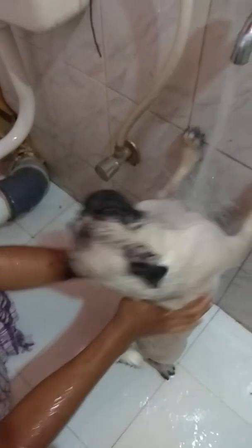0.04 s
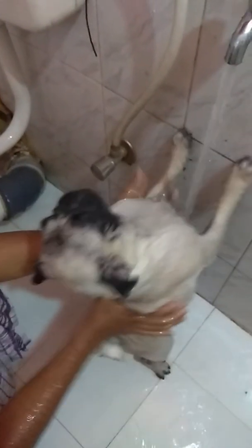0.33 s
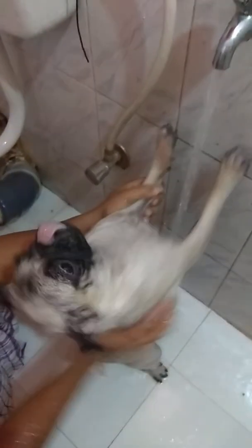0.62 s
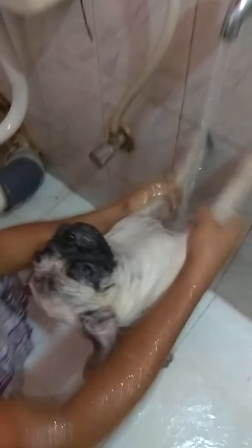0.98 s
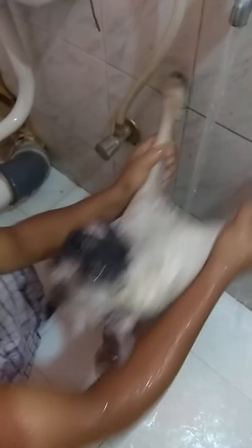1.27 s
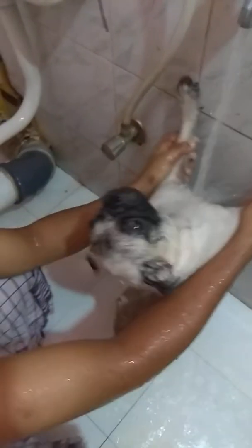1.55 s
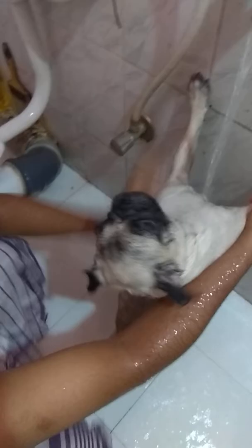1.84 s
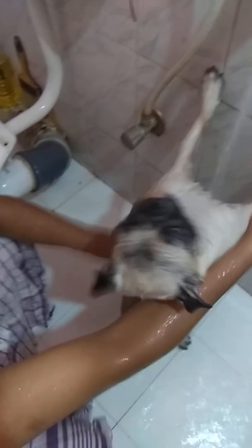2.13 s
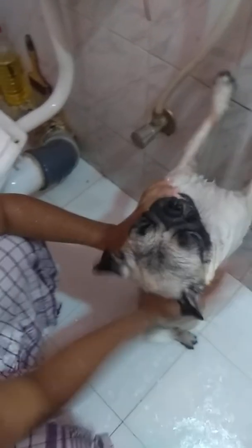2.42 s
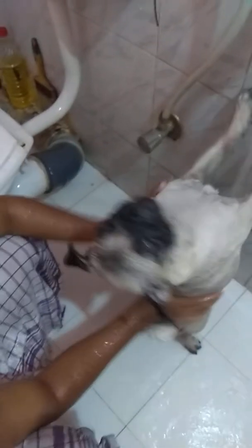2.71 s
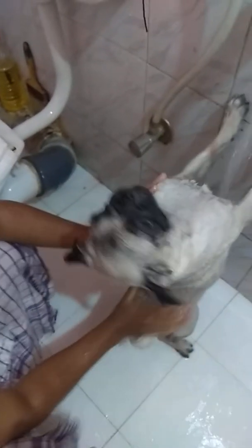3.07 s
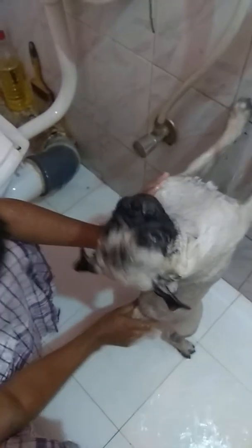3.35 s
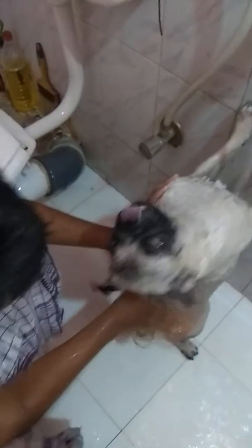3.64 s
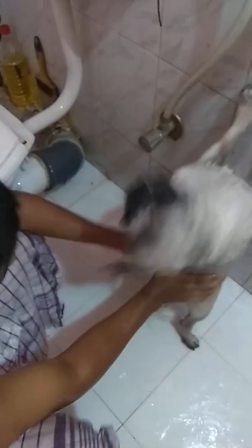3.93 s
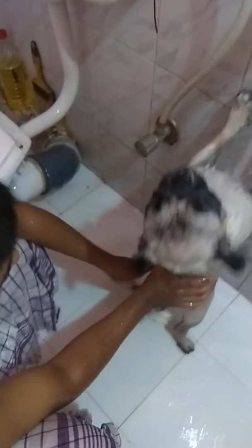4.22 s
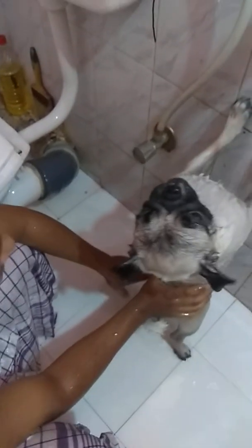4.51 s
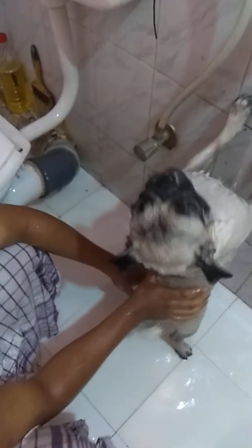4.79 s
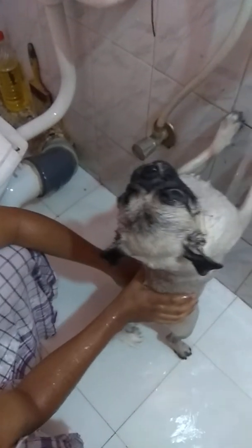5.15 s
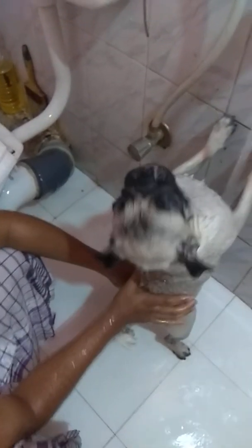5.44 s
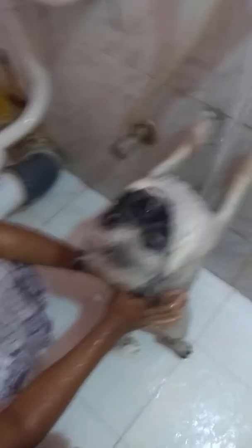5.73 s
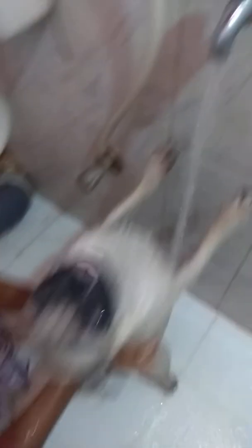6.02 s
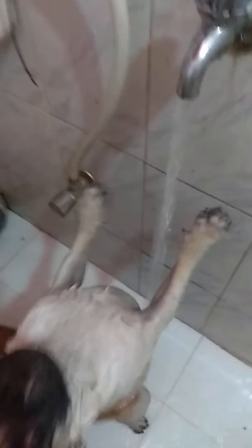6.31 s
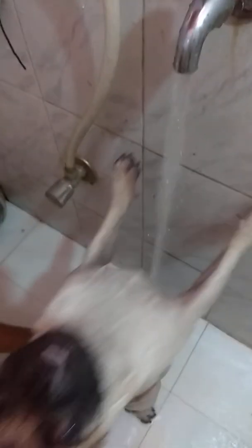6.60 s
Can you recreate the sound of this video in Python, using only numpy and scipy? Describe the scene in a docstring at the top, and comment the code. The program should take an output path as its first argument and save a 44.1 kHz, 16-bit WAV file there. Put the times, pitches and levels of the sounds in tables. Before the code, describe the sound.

In an echoing tiled bathroom, a running tap sprays and spatters unevenly, burbling on a dog's wet coat and slapping the floor.

```python
"""Hissing spray and patter on tiles: a tap runs in a small bathroom while wet hands wash a dog.
The jet breaks into tiny impacts and ringing bubbles, and dips when a hand or paw smothers it.
On the dog it burbles in the coat and drums dully on the body, waking the room's standing waves.
Handfuls of water slap on the floor, hard drops tick close by, and the walls ring with it all
over a faint house rumble."""
import sys
import numpy as np
from scipy import signal
from scipy.fft import rfft, irfft, next_fast_len
from scipy.io import wavfile
from scipy.ndimage import uniform_filter1d, minimum_filter1d, map_coordinates

SR = 44100
rng = np.random.default_rng(int(sys.argv[2]) if len(sys.argv) > 2 else 0)


def output_pcm(signal):
    """Save a mono or channel-first signal as 16-bit PCM at the path in sys.argv[1].

    Samples are clipped to [-1, 1] before scaling.
    """
    pcm = np.clip(np.atleast_2d(signal).T, -1, 1) * 32767
    wavfile.write(sys.argv[1], SR, np.round(pcm).astype(np.int16))


N = 293706
TIME = np.arange(N) / SR
FFT_SIZE = next_fast_len(N + SR // 20, True)
CUTOFF_HZ = 15900

# jet strength: (time [s], fine spray level [dB], large drop level [dB])
JET_LEVELS = [(0.0, -26.5, -30), (0.49, -27.5, -31), (0.54, -20, -22.5), (1.1, -17, -22),
              (1.35, -15.5, -25.5), (1.62, -18, -19.5), (1.9, -17.5, -24), (2.15, -19, -23.5),
              (2.55, -17, -25), (3.1, -18.5, -30), (3.6, -16.5, -22.5), (3.92, -19.5, -24),
              (4.22, -26.5, -30), (4.5, -28.5, -29), (4.85, -26, -28.5), (5.15, -21.5, -26.5),
              (5.22, -17, -24), (6.05, -19, -23.5), (6.35, -18.5, -27), (6.66, -22, -22.5)]


def from_db(db):
    """Decibels to gain."""
    return 10 ** (np.asarray(db) / 20)


def unit_rms(x):
    """Scale to rms 1."""
    return x / np.sqrt(np.mean(x ** 2) + 1e-20)


def in_time(rows):
    """Each column of a time table at every sample."""
    times_s, *columns = np.transpose(rows)
    return [np.interp(TIME, times_s, column) for column in columns]


def at_hz(points, hz):
    """Read a table on a log-frequency axis."""
    knots_hz, values = np.transpose(points)
    return np.interp(np.log(np.maximum(hz, 1)), np.log(knots_hz), values)


def filtered(x, gain_at):
    """Filter by a gain that is a function of frequency."""
    size = next_fast_len(x.shape[-1] + SR // 20, True)
    return irfft(rfft(x, size) * gain_at(np.fft.rfftfreq(size, 1 / SR)), size)[..., :x.shape[-1]]


def tinted(x, spectrum):
    """Filter by a spectrum table; rms 1."""
    return unit_rms(filtered(x, lambda hz: from_db(at_hz(spectrum, hz))))


def ring(x, hz, t60_s):
    """One decaying mode driven by x."""
    r, w = from_db(-60 / (t60_s * SR)), 2 * np.pi * hz / SR
    return signal.lfilter([0, np.sin(w)], [1, -2 * r * np.cos(w), r * r], x + 1e-18)


def impacts(per_s, spread_db, size=N):
    """Drops landing at random: impulses of uneven strength and random sign."""
    chance, bulk = rng.random((2, size))
    hits, out = np.flatnonzero(chance < per_s / SR), np.zeros(size)
    out[hits] = from_db(-spread_db * np.log(bulk[hits] + 1 / 100)) * (-1.) ** hits
    return out


def bubbles(per_s, low_hz, high_hz, cycles, rise, count, size):
    """Trapped air rings at a pitch set by its size, rising as it nears the surface."""
    chance, when, smallness, strength = rng.random((count, 4)).T[:, :, None]
    hz, t = low_hz * (high_hz / low_hz) ** smallness, TIME[:size]
    age = hz * t / cycles
    sounding = chance < per_s * N / SR / count
    gain = sounding * from_db(-4.0 * np.log(strength + 1 / 20)) * np.sqrt(hz)
    fade = from_db(-60 * age) * (1 - t / t[-1])
    pings = gain * fade * np.sin(2 * np.pi * hz * t * (1 + rise * age))
    samples = (when * N).astype(int) + np.arange(size)
    return unit_rms(np.bincount(samples.ravel(), pings.ravel(), N)[:N])


def room_response(direct_db, bands=8):
    """Stereo impulse response: direct sound, then dense tile echoes, longest in the midrange."""
    # reverberation: (frequency [Hz], t60 [s])
    decay = [(100, 0.33), (500, 0.61), (2000, 0.67), (6000, 0.24), (15000, 0.45)]
    # left-right likeness of the echoes: (frequency [Hz], correlation [-1..1])
    likeness = [(60, 0.84), (160, 0.89), (350, 0.74), (600, 0.68), (1100, 0.13), (2000, -0.096),
                (15000, 0.082)]
    t, hz = TIME[:SR], np.fft.rfftfreq(SR, 1 / SR)
    mid, side = rfft(rng.standard_normal((2, SR)))
    alike = at_hz(likeness, hz)
    echoes = np.sqrt(1 + alike) * mid + np.sqrt(1 - alike) * side * [[1], [-1]]
    centres_hz, response = np.geomspace(100, CUTOFF_HZ, bands), 0
    for centre_hz, share in zip(centres_hz, np.eye(bands)):
        fade = from_db(-60 * t / at_hz(decay, centre_hz))
        band = irfft(echoes * at_hz(np.c_[centres_hz, share], hz), SR)
        response = response + band * fade / np.sqrt(2 * np.sum(fade ** 2))
    response[[0, 1], [0, 12]] += from_db(direct_db)   # right lags 12 samples
    return response / np.sqrt(1 + from_db(2 * direct_db))


def heard_in(room, x):
    """A mono source through the stereo room response."""
    return signal.fftconvolve(x[None], room, axes=1)[:, :N]


def landing_spots(direct_db, count=4, moves_per_s=1.62):
    """The water shifts as the dog moves: (share over time, room transfer function) per spot."""
    turn = moves_per_s * TIME - np.arange(count)[:, None]
    shares = np.maximum(np.cos(2 * np.pi * turn / count), 0)
    shares /= np.sqrt(np.sum(shares ** 2, axis=0))
    return [(share, rfft(room_response(direct_db), FFT_SIZE)) for share in shares]


def stream(spots, grains, spectrum):
    """An unbroken rain of grains whose echoes already fill the room; rms 1."""
    tint = from_db(at_hz(spectrum, np.fft.rfftfreq(FFT_SIZE, 1 / SR)))
    heard = sum(rfft(np.resize(grains * share, FFT_SIZE)) * transfer for share, transfer in spots)
    return unit_rms(irfft(heard * tint, FFT_SIZE)[:, :N])


def smothering_db():
    """Loss of jet level as a hand or paw moves in and clears again."""
    # (deepest at [s], depth [dB], moving in [s], clearing [s])
    blocks = [(0.155, 4.5, 0.054, .04), (0.935, 4, 0.058, 0.033), (1.25, 1.5, 0.026, 0.036),
              (1.40, 7, 0.12, 0.036), (1.535, 4, 0.097, 0.022), (1.79, 17.5, 0.18, 0.051),
              (2.01, 4.5, 0.069, 0.038), (2.3, 8, 0.031, 0.044), (2.78, 7, 0.077, 0.064),
              (2.94, 8.5, 0.15, 0.056), (3.17, 2, 0.062, .045), (3.52, 6, 0.091, 0.13),
              (4.165, 9, 0.19, 0.052), (4.85, 1.5, .04, 0.057), (5.49, 1.5, 0.19, 0.021),
              (5.98, 3, 0.082, .03)]
    return sum(np.interp(TIME, [at_s - in_s, at_s, at_s + clear_s], [0, depth_db, 0])
               for at_s, depth_db, in_s, clear_s in blocks)


def spurts(per_s, size_db, fade_s):
    """The jet breaks unevenly: the gain jumps with each spurt and sinks back."""
    kicks = (rng.random(N) < per_s / SR) * rng.uniform(0.54, 1, N)
    swell = signal.lfilter([1], [1, -np.exp(-1 / (fade_s * SR))], kicks + 1e-18)
    return unit_rms(np.sqrt(1 + from_db(2 * size_db) * swell))


def scattered(drops, direct_db, echo_s):
    """Drops land all over, each with its own left-right lag; their echoes blur to a wash."""
    lag_samples = rng.integers(-16, 17, N)
    right = np.bincount(np.clip(np.arange(N) + lag_samples, 0, N - 1), drops, N)
    pole = np.exp(-1 / (echo_s * SR))
    energy, _ = signal.lfilter([1 - pole], [1, -pole], unit_rms(drops) ** 2, zi=[1.])
    wash = np.sqrt(energy) * rng.standard_normal((2, N))
    return from_db(direct_db) * unit_rms(np.array([drops, right])) + wash


def spray(spots):
    """Hiss of thousands of tiny impacts arriving in spurts, and fizz of the smallest bubbles."""
    # spray colour: (frequency [Hz], gain [dB])
    spectrum = [(200, -85), (1200, -48), (2500, -57), (4500, -13.5), (6000, -8), (7500, -3.5), (9000, 1.5),
                (10700, 3), (12500, 2), (14500, 0.5), (16000, -11)]
    level_db = in_time(JET_LEVELS)[0] - smothering_db()
    drops = impacts(per_s=5000, spread_db=2.0) * spurts(per_s=70, size_db=6.5, fade_s=0.0052)
    hiss = tinted(scattered(drops, direct_db=-5.5, echo_s=0.0097), spectrum)
    pings = bubbles(per_s=450, low_hz=4314, high_hz=15500, cycles=39, rise=0.02, count=3500, size=180)
    fizz = stream(spots, pings, spectrum)
    return from_db(level_db) * (from_db(1.0) * hiss + from_db(0.6) * fizz)


def patter(spots):
    """Larger drops tick on the water film and leave small ringing bubbles."""
    # patter colour: (frequency [Hz], gain [dB])
    spectrum = [(100, -78), (620, -37), (800, -23), (1200, -19), (1800, -12), (2350, -3), (3300, -3),
                (4500, 3), (5800, -1), (7500, -0.5), (11000, -64)]
    level_db = in_time(JET_LEVELS)[1] - smothering_db() + 2.03
    ticks = impacts(per_s=1300, spread_db=7.0) * spurts(per_s=8.7, size_db=-18.0, fade_s=0.018)
    pings = bubbles(per_s=400, low_hz=1876, high_hz=8450, cycles=24.6, rise=0.11, count=2700, size=450)
    return from_db(level_db) * stream(spots, unit_rms(ticks) + from_db(-2.5) * pings, spectrum)


def shifting_colour(x, depth_db, width_hz, per_s, size=512):
    """Narrow bands swell and fade at random, giving a wet, shimmering texture; level is kept."""
    hz, times_s, frames = signal.stft(x.astype(np.float32), SR, nperseg=size)
    grid = np.meshgrid(hz / width_hz, times_s * per_s, indexing="ij")
    swells = map_coordinates(rng.standard_normal((256, 256)), grid, order=1, mode="wrap")
    gain = from_db(depth_db * np.tanh(swells)).astype(np.float32)
    _, shaped = signal.istft(frames * gain, SR)
    return np.std(x) * unit_rms(shaped[:, :N])


def jet_on_coat(spots):
    """The jet burbles in the wet fur and drums on the body, which wakes the standing waves."""
    # flow onto the dog: (time [s], burble level [dB], drum level [dB])
    flow = [(0.0, -53.5, -61), (0.2, -71, -64), (0.48, -67, -88), (0.66, -37, -56), (0.84, -36, -44),
            (0.92, -37.5, -34.5), (1.03, -39, -42), (1.25, -46.5, -47.5), (1.55, -45, -41.5),
            (1.9, -45.5, -60), (2.25, -43, -47.5), (3.2, -47, -60.5), (3.52, -44, -60), (3.6, -36, -44),
            (3.8, -39.5, -43), (4.0, -39.5, -35.5), (4.26, -54, -49), (4.52, -74, -70), (5.1, -75, -75),
            (5.19, -54, -74), (5.46, -49, -81), (5.6, -43, -56.5), (6.1, -44, -49), (6.66, -47, -57)]
    # colours of fur and body: (frequency [Hz], gain [dB])
    burble_spectrum = [(60, -58), (200, -12.5), (330, 0), (480, -6), (590, 2), (690, 1), (850, 2),
                       (1050, 2), (1700, 5.5), (2600, -7)]
    drum_spectrum = [(25, -44), (45, -49), (65, -34), (90, -18), (130, -4.5), (200, 4), (270, 3.5),
                     (350, 7), (480, -4), (800, 4.5), (2000, -60)]
    # standing waves between the walls: (frequency [Hz], level [dB], t60 [s])
    modes = [(121.4, 7, 1.5), (179, -4, 1.0), (192, 5, 0.43), (201, 11.5, 2.6), (224.5, 8, 0.6),
             (290, -15, 0.71), (370, -15, 1.8)]
    burble_db, drum_db = in_time(flow)
    churn = unit_rms(impacts(per_s=1100, spread_db=-2.5))
    gurgle = bubbles(per_s=90, low_hz=373, high_hz=1880, cycles=6.8, rise=0.14, count=700, size=700)
    blows = impacts(per_s=480, spread_db=3.5)
    boom = sum(from_db(db) * ring(blows, hz, t60_s) / np.sqrt(t60_s) for hz, db, t60_s in modes)
    drum = from_db(-2.5) * stream(spots, blows, drum_spectrum) + from_db(-9.0) * unit_rms(boom)
    burble = stream(spots, churn + from_db(-4.0) * gurgle, burble_spectrum)
    burble = shifting_colour(burble, depth_db=2.5, width_hz=109.6, per_s=13, size=1024)
    return from_db(burble_db + 5.0) * burble + from_db(drum_db) * drum


def house_rumble(level_db=-78):
    """Faint steady low noise, partly common to both channels."""
    # rumble colour: (frequency [Hz], gain [dB])
    spectrum = [(25, -22), (50, -10), (90, -2), (130, -13), (250, -21), (1000, -38)]
    return from_db(level_db) * tinted(rng.standard_normal((2, N)) + rng.standard_normal(N), spectrum)


def splashes(room, lead_samples=200):
    """Each lump of water bursts into a shower of impacts around one pitch, swelling and fading."""
    # slaps on floor and dog: (time [s], level [dB], pitch [Hz], spread [oct], swell [s], fade [s])
    slaps = [ (0.020, -44.5, 810, 0.13, 0.0098, 0.031), (0.029, -53, 160, .22, 0.017, .03),
             (0.188, -23, 3400, 0.39, 0.0019, 0.037), (0.214, -38, 1600, 0.26, 0.0099, 0.064),
             (0.264, -54, 160, 0.3, .015, 0.023), (0.299, -46, 1190, 0.32, 0.027, 0.22),
             (0.36, -20, 10600, 0.26, .003, .02), (0.329, -24.5, 4440, 0.27, 0.0018, 0.039),
             (0.458, -28, 2480, 0.28, .004, 0.062), (0.507, -17, 9600, 0.34, .002, .09),
             (0.525, -21.5, 2430, 0.53, 0.0081, 0.066), (0.590, -14.5, 7000, 0.69, .003, 0.032),
             (0.623, -17, 1620, 0.32, 0.0065, 0.026), (0.663, -37.5, 533, 0.3, .001, .025),
             (0.761, -27, 2950, 0.2, .004, 0.088), (0.844, -19.5, 2030, 0.33, 0.0057, 0.088),
             (0.95, -24.5, 645, 0.33, 0.025, .06), (1.005, -21, 1950, 0.65, 0.0037, 0.076),
             (1.087, -19, 5500, 1.1, 0.0019, 0.028), (1.135, -44, 2780, 0.49, 0.014, 0.029),
             (1.293, -17.5, 4350, 0.76, 0.0019, 0.053), (1.426, -15, 7960, 1.35, 0.0022, 0.033),
             (1.479, -30.5, 546, 0.68, 0.019, 0.064), (1.553, -17.5, 1740, 0.43, 0.0013, 0.066),
             (1.794, -19, 10130, 0.47, .0005, .012), (1.805, -18, 9500, 0.68, 0.0018, .04),
             (1.830, -27, 2900, 0.56, 0.0036, 0.14), (2.025, -15, 5030, 0.11, .001, 0.048),
             (2.026, -16, 2850, 0.34, 0.0024, 0.044), (2.139, -24.5, 2720, 0.3, .005, 0.046),
             (2.215, -26, 2920, 0.23, 0.0071, 0.031), (2.283, -11, 11400, 0.23, .001, 0.03),
             (2.390, -16.5, 2350, 0.45, 0.0056, 0.034), (2.395, -37, 1020, .2, 0.0027, 0.024),
             (2.530, -21, 2760, 0.36, 0.0034, 0.04), (2.578, -16.5, 3500, 0.64, 0.0027, 0.011),
             (2.694, -17, 4500, 0.77, .0015, 0.042), (2.8, -16, 11100, 0.3, .001, .02),
             (2.848, -14, 10800, 0.33, .004, 0.033), (2.951, -16, 9700, 0.48, .002, 0.021),
             (3.038, -14, 8900, 0.77, 0.0043, 0.047), (3.195, -8, 12900, 0.2, 0.0023, 0.013),
             (3.325, -20, 5500, 0.37, 0.0023, 0.033), (3.344, -35, 630, 0.67, .015, .035),
             (3.364, -24, 1810, 0.32, 0.0035, 0.02), (3.427, -12, 7750, 0.54, 0.0015, 0.068),
             (3.555, -20.5, 764, 0.55, 0.038, 0.046), (3.574, -33, 1600, 0.2, 0.018, .045),
             (3.685, -17, 2330, 0.34, 0.0075, 0.051), (3.894, -18.5, 3160, .49, .005, 0.024),
             (3.945, -29, 615, 0.49, 0.027, 0.034), (4.085, -23, 4050, 0.48, 0.002, 0.045),
             (4.345, -39.5, 826, 0.14, .012, 0.025), (4.405, -21.5, 10500, 0.48, .004, 0.035),
             (4.591, -27.5, 3550, 0.34, 0.0047, 0.068), (4.660, -27.5, 2200, 0.22, 0.006, .045),
             (4.748, -19, 5400, 0.33, 0.002, 0.033), (4.763, -10.5, 10300, 0.29, 0.0039, 0.031),
             (4.78, -50.5, 880, 0.19, .025, 0.048), (4.80, -57, 332, 0.27, 0.031, 0.029),
             (4.975, -55, 900, .16, 0.014, .05), (4.904, -28, 4100, 0.36, 0.0028, 0.14),
             (5.12, -20, 3020, 0.66, 0.0048, 0.029), (5.170, -47, 370, 0.24, 0.031, 0.14),
             (5.175, -16, 5170, 0.32, 0.014, 0.069), (5.27, -26.5, 2680, 0.51, 0.013, 0.076),
             (5.513, -16.5, 3430, 0.69, 0.0052, 0.029), (5.635, -29, 560, 0.52, 0.035, 0.053),
             (5.672, -16, 3380, 0.38, 0.02, 0.048), (5.839, -23, 3320, 0.51, .012, 0.047),
             (5.904, -19.5, 2540, 0.36, 0.0039, 0.017), (5.995, -7.5, 8850, 1.34, 0.0038, 0.019),
             (6.099, -13.5, 2200, 0.37, 0.0064, 0.041), (6.10, -38, 960, 0.25, .004, 0.031),
             (6.395, -16.5, 2760, 0.24, 0.01, 0.027), (6.432, -20.5, 2370, 0.34, 0.0046, 0.03),
             (6.474, -12, 5950, 0.66, .001, 0.037)]
    out, t = np.zeros((2, N + SR)), TIME[:SR // 3]
    for at_s, db, pitch_hz, octaves, swell_s, fade_s in slaps:
        shower = unit_rms(impacts(per_s=4400, spread_db=2.0, size=2 * len(t))).reshape(2, -1)
        shower = shower * (1 - np.exp(-t / swell_s)) * np.exp(-t / fade_s)
        shower = np.pad(shower, [(0, 0), (lead_samples, 0)])   # silent lead avoids an onset thump
        hump = lambda hz: unit_rms(np.exp(-.5 * abs(np.log2((hz + 1) / pitch_hz) / octaves) ** 1.59))
        start = round(at_s * SR)
        out[:, start - lead_samples:start + len(t)] += from_db(db) * filtered(shower, hump)
    return from_db(0.2) * out[:, :N] + from_db(1.0) * heard_in(room, out[0, :N])


def hard_drops(room):
    """Single close drops ring for about a millisecond and echo off the tiles."""
    # (time [s], level [dB], pitch [Hz], left minus right [dB])
    drops = [(0.547, -21, 9000, 0), (0.611, -12, 8000, -1), (0.973, -8, 10000, 0), (1.093, -5, 10000, 3),
             (1.796, -10, 10000, 15), (1.907, -8, 11000, 0), (2.028, -7, 4520, 0), (2.153, -3, 7000, 0),
             (2.799, -6, 11000, -8), (3.432, -5, 9000, 2), (3.447, -13, 9000, -3), (3.647, -1, 10000, 0),
             (4.295, -9, 10000, 0), (5.617, -9, 10000, -2)]
    out, t = np.zeros((2, N)), TIME[:SR // 100]
    for at_s, db, hz, pan_db in drops:
        tick, start = ring(t == 0, hz, t60_s=0.0018), round(at_s * SR)
        out[:, start:start + len(t)] += from_db(db + pan_db * np.array([[.5], [-.5]])) * tick
    return from_db(-5.5) * out + from_db(-6.0) * heard_in(room, out.mean(axis=0))


def gushes():
    """Each heavy gush on the body builds up one standing wave, which rings out unevenly."""
    # (time [s], level [dB], frequency [Hz], push length [s])
    pushes = [(0.86, -44.5, 173, 0.038), (1.43, -43, 123.7, 0.073), (1.46, -32.5, 345, 0.032),
              (3.54, -43.5, 175, 0.16), (3.85, -43, 175.4, 0.079), (4.11, -48.5, 179, 0.048)]
    out, t = np.zeros(N + SR), TIME[:SR]
    for at_s, db, hz, length_s in pushes:
        push = np.sin(np.pi * np.minimum(t / length_s, 1)) * np.sin(2 * np.pi * hz * t)
        uneven = 1 + 0.43 * unit_rms(uniform_filter1d(rng.standard_normal(SR), SR // 50))
        wave, start = ring(push, hz, t60_s=0.94), round(at_s * SR)
        out[start:start + SR] += from_db(db) * uneven * wave / np.abs(wave).max()
    return out[:N]


def limited(x, size=88):
    """Fast limiter: gain dips around any peak above full scale."""
    allowed = 1 / np.maximum(np.abs(x).max(axis=0), 1)
    return x * uniform_filter1d(minimum_filter1d(allowed, size + 1), size)


def scene():
    """Jet, splashes and drops in one tiled room, over the house rumble."""
    spots, room = landing_spots(direct_db=-16.0), room_response(direct_db=-12.5)
    on_tiles = shifting_colour(patter(spots) + splashes(room), depth_db=5.0, width_hz=170.6, per_s=24)
    return spray(spots) + on_tiles + jet_on_coat(spots) + gushes() + hard_drops(room) + house_rumble()


def record(dry):
    """Each microphone port adds its own colour; peaks are limited, deep bass and top are cut."""
    # port imbalance: (frequency [Hz], left minus right [dB])
    balance = [(60, -4), (78, 6), (100, 1), (130, -5.5), (170, 4.5), (220, -6.5), (290, 1.5), (380, -3),
               (490, -3.5), (640, -1), (830, -0.5), (1080, -2), (1410, 0.5), (1830, 2), (2380, 2.5),
               (3100, 1), (4030, 1.5), (5240, 0), (6820, -1), (8870, -5.5), (11500, -1), (15000, 3)]
    ported = filtered(dry, lambda hz: from_db(at_hz(balance, hz) * [[.5], [-.5]]))
    thinned = signal.sosfilt(signal.butter(2, 68, "high", fs=SR, output="sos"), limited(ported))
    return filtered(thinned, lambda hz: 1 / np.sqrt(1 + (hz / CUTOFF_HZ) ** 240))


dry = scene()
out = record(dry)
output_pcm(out)
```